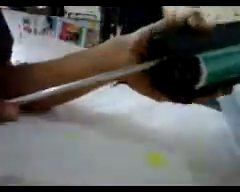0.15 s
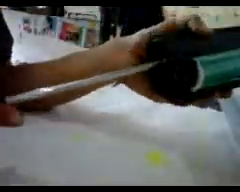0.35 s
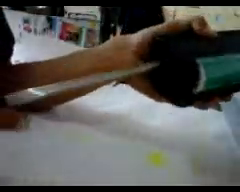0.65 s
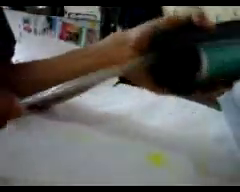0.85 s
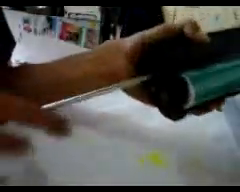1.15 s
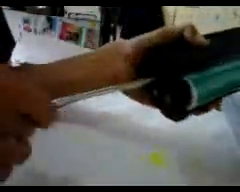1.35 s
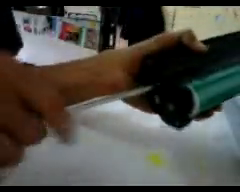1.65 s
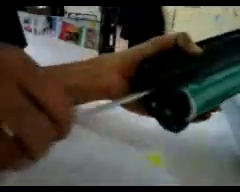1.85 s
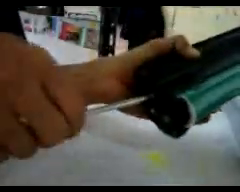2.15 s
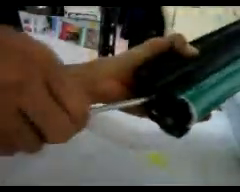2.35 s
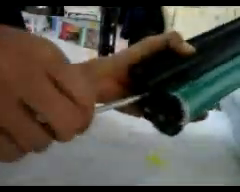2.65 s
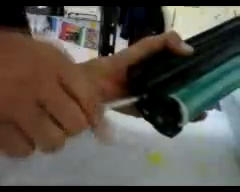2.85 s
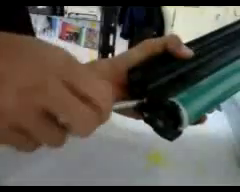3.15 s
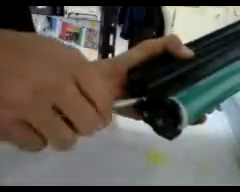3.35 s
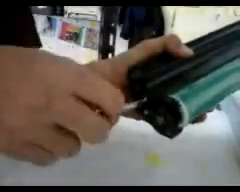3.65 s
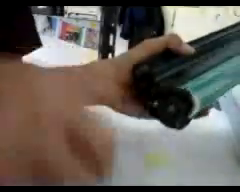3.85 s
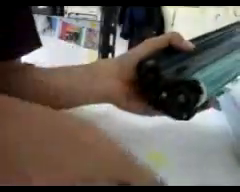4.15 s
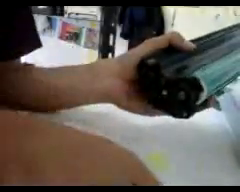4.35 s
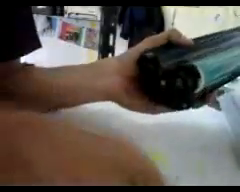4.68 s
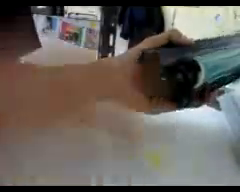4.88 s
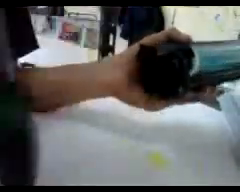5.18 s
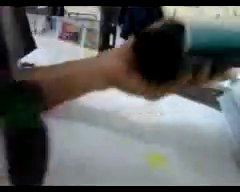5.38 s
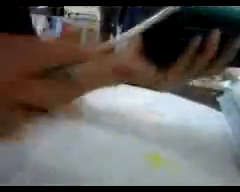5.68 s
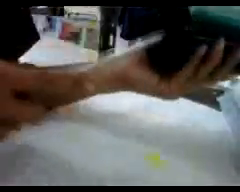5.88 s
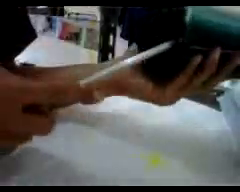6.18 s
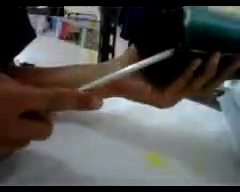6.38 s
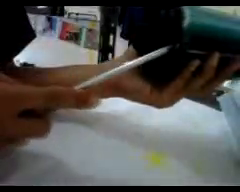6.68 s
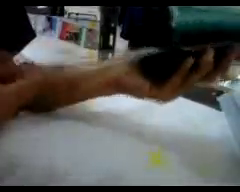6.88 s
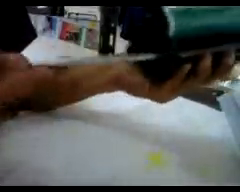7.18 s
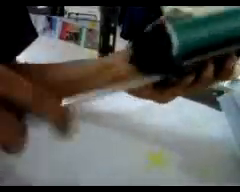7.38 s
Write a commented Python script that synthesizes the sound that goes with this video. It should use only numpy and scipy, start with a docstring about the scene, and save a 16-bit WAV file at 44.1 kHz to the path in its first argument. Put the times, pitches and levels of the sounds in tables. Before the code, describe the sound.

A small camera with muffled top end sits close to hands working a thin steel rod into a hollow plastic drum in a small cluttered room. Low street rumble and soft hiss run throughout. At 0.35 s a sharp double click snaps with a short crackle; faint clicks follow to 1.5 s. A low, uneven vehicle drone swells by 1.4 s, stays until about 3.3 s, then fades, with a click at 1.7 s and small crunches and light knocks around 2.3-3.1 s. At 4.2 s tools thump down loudly in a distorted cluster, parts chattering, with lesser knocks at 4.8-5.1 s. The loudest hollow bang lands at 5.4 s, with a rattle, and a weaker thud at 5.7 s. Then quieter background, distinct plastic clicks at 6.4 and 6.75 s, a brief crackle, and tiny crunches until 7.5 s.

```python
"""Hands work a thin steel rod into a plastic toner drum over a workbench, close to a small camera.
Short clicks and bright crunches ring hollow shell modes throughout, some together with the blows;
a vehicle's drone swells, stays and fades outside. Then tools thump down on the bench, overloading the
camera through the wood, loose parts chatter, a hollow part is set down hard and the drum is turned round.
Street noise lies under it all, with brief dips, and a small cluttered room answers the near sounds."""
import sys
import numpy as np
from scipy import signal
from scipy.fft import rfft, irfft
from scipy.io import wavfile
from scipy.ndimage import uniform_filter1d

SR = 44100
rng = np.random.default_rng(int(sys.argv[2]) if len(sys.argv) > 2 else 0)


def boost(x):
    """Linear amplitude factor 10**(x/20) for a level x in decibels (scalar or array-like)."""
    u = np.asarray(x, float) / 20
    return 10 ** u


def pcm_store(signal):
    """Save signal as 16-bit PCM."""
    levels = np.round(np.clip(np.atleast_2d(signal), -1, 1) * 32767)
    wavfile.write(sys.argv[1], SR, levels.astype(np.int16).T)


N = 332073


def unit(x):
    """Scale to rms 1."""
    return x / np.sqrt(np.mean(x ** 2))


def shaped(x, db_at):
    """Colour a sound by a function from Hz to dB."""
    hz = np.maximum(np.fft.rfftfreq(len(x), 1 / SR), 1)
    return irfft(rfft(x) * boost(db_at(hz)), len(x))


def walk(rate):
    """Random levels held 1 / rate s and slewed twice; spread 1."""
    hold = int(SR / rate)
    steps = np.repeat(rng.standard_normal(N // hold + 1), hold)
    x = uniform_filter1d(uniform_filter1d(steps, hold), hold)[:N]
    return x / x.std()


def strikes(events, modes, edges_hz, scatter_db, detune, haze_db, haze_t60, rise_ms, reach, firm, bright_db):
    """Each event, a short rough push, rings a low, a main and a high group of modes."""
    out = np.zeros(N + SR)
    t = np.arange(SR // 3) / SR
    ms_since = 1000 * t[:2048]
    hz, db, t60 = np.transpose(modes)[:, :, None]
    # modes above the last edge fall in no group and stay silent
    group = np.digitize(hz[:, 0], edges_hz) - 1
    low_band = signal.butter(3, edges_hz[:2], "band", fs=SR, output="sos")
    chance = rng.standard_normal((len(events), 2, len(modes), 1))
    rough = rng.standard_normal((len(events), 4, len(t)))
    for event, (gain, tune), noise in zip(events, chance, rough):
        s, main_db, low_db, high_db, rattle_ms, bright_hz, ring, pitch, main_hz = event
        # every push weights and loads the modes a little differently
        mode_hz = hz * np.where(group == 1, pitch, 1)[:, None] * (1 + detune * tune)
        decay = 1000. ** (-t / (ring * t60))
        rings = boost(db + scatter_db * gain) * np.sin(2 * np.pi * mode_hz * t) * decay
        # the push chatters: a few hard grains among many soft ones
        grains = noise[3, :2048] * np.abs(noise[3, 2048:4096]) ** 1.41
        push = grains * np.exp(-ms_since / max(rattle_ms, .2)) * np.minimum(ms_since / rise_ms, 1)
        # one firm impulse comes at the top of the rise
        impulse = np.arange(len(push)) == int(rise_ms * SR / 1000)
        push = push / np.linalg.norm(push) + firm * impulse
        # an event with more top also reaches higher
        top_hz = np.clip(edges_hz[3] * boost(reach * high_db), 1.39 * bright_hz, 7000)
        main_band = signal.butter(3, main_hz, "band", fs=SR, output="sos")
        high_band = signal.butter(3, [edges_hz[2], top_hz], "band", fs=SR, output="sos")
        i = int(s * SR)
        for g, (band, part_db) in enumerate([(low_band, low_db), (main_band, 0), (high_band, high_db)]):
            # countless small modes blur into a decaying haze between the clear ones
            haze = boost(haze_db[g]) * noise[g] * 1000. ** (-t / (ring * haze_t60[g]))
            struck = signal.fftconvolve(rings[group == g].sum(0) + haze, push)[:len(t)]
            part = signal.sosfilt(band, struck)
            if g == 2:  # one stretch of the top range stands out
                part = part + boost(bright_db) * signal.lfilter(*signal.iirpeak(bright_hz, 5, SR), part)
            out[i:i + len(t)] += boost(main_db + part_db) * part / np.abs(part).max()
    return out[:N]


def clicks_and_crunches():
    """Rough pushes ring body, main and treble modes of hollow plastic, shortened by the gripping hand."""
    # short clicks and bright crunches, some together with the blows: start_s, main_peak_db,
    # treble_db and body_db (both beside the main peak), rattle_ms, bright_hz (favoured treble)
    short_sounds = [(0.3483, -17, 0.5, -8.5, 1.4, 3860), (0.3555, -19.5, -2.5, -10, 1.7, 3740),
                    (0.663, -33.5, -8.5, -10, 2.9, 3700), (0.8071, -60.5, 17.5, -14, 0.88, 4300),
                    (0.857, -46, -18, 0, 11, 4260), (0.898, -45.5, 7, -3, 3.3, 5200),
                    (0.9738, -41.5, -3, -24, 0.82, 3040), (1.2379, -45.5, -2.5, 6.5, 2.6, 4350),
                    (1.4456, -46.5, -20, -1.5, 8.7, 2640), (1.696, -30, -7.5, -15, 1.2, 4400),
                    (1.869, -51, 13.5, -14, 1.8, 4400), (2.266, -43, 0, -1, 5.8, 5130),
                    (2.4444, -41.5, 5.5, -5, 3.4, 5310), (2.5796, -40, 13.5, 5.5, 11, 4510),
                    (3.035, -40, -31, 5, 2.2, 2700), (3.046, -56, -21, 23.5, 2.8, 2700),
                    (4.201, -49, 13.5, -7, 3, 4700), (4.2055, -27.5, -1, -12, 2.6, 3400),
                    (4.2365, -43, 3.5, -15, 1.4, 3560), (4.467, -49.5, 9, 9.5, 5, 3680),
                    (4.609, -51.5, 6, 5, 2.7, 4100), (4.6723, -53.5, 6.5, 5, 1.6, 4800),
                    (4.6949, -44, 0.5, -16, 2.2, 4660), (4.8205, -48, 1, 9, 7.5, 4500),
                    (4.884, -41, 0, -10, 3.7, 3500), (5.416, -32.5, -1, 1, 4, 4220),
                    (5.451, -50, 3.5, -10, 3.3, 4000), (5.9553, -65, 14.5, -5, 4.3, 4250),
                    (6.098, -59, 12, -1, 1.4, 4280), (6.4368, -31.5, -3, -16, 3.5, 2900),
                    (6.755, -27.5, 1, -23, 6.2, 3670), (6.765, -31.5, -7, -10, 3.1, 2900),
                    (6.974, -40.5, -6, -17, 2.4, 4230), (7.0772, -44, 8.5, -3, 0.97, 3750),
                    (7.3766, -48.5, -17, -28, 2.6, 2650), (7.391, -50.5, 4, -28, 6.1, 2640),
                    (7.4128, -56, 15.5, -1, 2.5, 4280), (7.438, -47.5, 12.5, -7, 7.5, 3000)]
    # modes of the hollow shell: mode_hz, level_db, free_t60_s (before the grip)
    shell_modes = [(598, 7, 0.073), (687, 5, 0.04), (1508, -9, 0.07), (1678, -0.5, 0.04), (1867, -3, 0.057),
                   (2028, 0.5, 0.044), (2350, -7.5, 0.076), (2675, -3.5, 0.06), (2876, -5.5, 0.095),
                   (3196, -8.5, 0.034), (3486, -9, 0.069), (3670, -2.5, 0.06), (3794, -13.5, 0.047),
                   (4164, -10.5, 0.042), (4620, -6, 0.03), (5340, -3, 0.022)]
    grip = 0.68  # share of the free ring time left by the holding hand
    turned_s = 5.5  # the drum is turned round in the hand: its main modes and their range shift
    edges_hz = (500, 1440, 2550, 4400)
    events = []
    for s, main_db, treble_db, body_db, rattle_ms, bright_hz in short_sounds:
        pitch, main_hz = (0.97, (1570, 2120)) if s > turned_s else (1, edges_hz[1:3])
        events.append((s, main_db, body_db, treble_db, rattle_ms, bright_hz, grip, pitch, main_hz))
    return strikes(events, shell_modes, edges_hz, scatter_db=2.5, detune=0.0051,
                   haze_db=(-19, 0, 7), haze_t60=(.05, .055, .045), rise_ms=1.9, reach=0.73,
                   firm=0.65, bright_db=5.5)


def bench_blows():
    """Tools put down hard ring the bench top in thump, main and clack modes."""
    # blows on the bench: start_s, main_peak_db, thump_db and clack_db (both beside the main peak),
    # ring_factor (times the free ring time)
    tool_blows = [(2.58, -33, -17, -2.5, 0.81), (3.037, -38.5, -12, 14.5, 0.29),
                  (4.205, -20, -1, 1.5, 0.76), (4.216, -14.5, -2.5, -2, 0.44), (4.229, -20, 0, -1.5, 0.26),
                  (4.263, -45.5, 19.5, -18, 1.1), (4.285, -37, 9.5, -16, 0.39), (4.364, -39, -32, 3, 0.35),
                  (4.479, -46.5, -7, 13, 0.077), (4.492, -41, -19, 12, 0.058),
                  (4.545, -50.5, -17, 3.5, 0.51), (4.822, -50, -15, 15.5, 0.16),
                  (4.832, -35, 13, -0.5, 0.84), (4.882, -28, -8, 4, 0.19), (4.895, -26.5, 11.5, -15, 0.7),
                  (4.993, -52, -10, 11, 0.64), (5.017, -43.5, -14, 3, 0.47), (5.077, -25, -2.5, -1.5, 0.54),
                  (5.415, -10, -12.5, 4, 0.64), (5.427, -18, -7.5, 0.5, 1.53), (5.481, -32, -8, -6, 1.5),
                  (5.69, -36.5, 7, -11, 0.89)]
    # modes of the bench top: mode_hz, level_db, free_t60_s (before the ring factor)
    bench_modes = [(63.6, -14, 0.13), (82, 22.5, 0.17), (117.8, 8.5, 0.24), (171.3, 23, 0.13),
                   (253, -16, 0.22), (313.2, -8, 0.26), (335.6, -20, 0.31), (374, -15, 0.22),
                   (433, -7, 0.033), (547, -7.5, 0.13), (607, -8, 0.15), (667.5, -4.5, 0.09),
                   (795, -4.5, 0.076), (1300, -15.5, 0.024), (1537, -8, 0.035)]
    contact_ms, clack_hz = 4.34, 663
    edges_hz = (45, 190, 430, 1500)
    events = [(s, main_db, thump_db, clack_db, contact_ms, clack_hz, ring, 1, edges_hz[1:3])
              for s, main_db, thump_db, clack_db, ring in tool_blows]
    return strikes(events, bench_modes, edges_hz, scatter_db=3, detune=0.0073,
                   haze_db=(8, 9.5, 8), haze_t60=(.13, .14, .11), rise_ms=2.162, reach=0.07,
                   firm=0.94, bright_db=-3.0)


def hollow_knocks():
    """A hollow part set down hard: a strong air mode and weaker neighbours, wavering as it rocks."""
    # hollow part set down hard: start_s, level_db (offset to the mode levels)
    set_downs = [(5.419, -6.5), (5.689, -33)]
    # modes of the hollow part: mode_hz, level_db, t60_s
    hollow_modes = [(123.4, -11.5, 0.24), (320.3, 1.5, 0.23), (363.5, -15.5, 0.15)]
    rise_ms = 9.9
    start_s, level_db = np.transpose(set_downs)
    since = np.maximum(np.arange(N) / SR - start_s[:, None], 0)
    ring = 0
    for hz, db, t60 in hollow_modes:
        wave = np.sin(2 * np.pi * hz * since + 0.25 * walk(45))
        ring = ring + boost(db) * 1000. ** (-since / t60) * wave
    knocks = ring * np.minimum(1000 * since / rise_ms, 1)
    return boost(level_db) @ knocks * boost(1.4 * walk(50))


def overloaded(shock):
    """The shock reaches the camera through the wood and flattens there, its top softened."""
    ceiling = boost(-17.5)
    flat = ceiling * np.tanh(shock / ceiling)
    return signal.lfilter(*signal.butter(1, 4500, fs=SR), flat)


def clatter():
    """Loose parts chatter and scrape: dense tiny ticks of unequal size, in ragged bunches."""
    # bunches of ticks: start_s, end_s, level_db (before the fade), centre_hz, fade_db (reached at the end)
    tick_bunches = [(0.339, 0.511, -41, 4720, -24.5), (0.352, 0.448, -40.5, 2480, -16),
                    (3.099, 3.174, -48.5, 5070, -1.5), (3.635, 3.709, -55.5, 5120, 0.5),
                    (4.204, 4.247, -36, 2930, -11), (4.221, 4.247, -46, 5200, -3),
                    (4.206, 4.244, -30, 1570, -11.5), (4.268, 4.291, -52.5, 1700, -3),
                    (4.27, 4.3, -54.5, 3670, -3.5), (4.801, 4.819, -45.5, 1300, -0.5),
                    (4.811, 4.845, -50, 4740, 2), (4.837, 4.877, -55.5, 4600, -1),
                    (4.875, 4.907, -44.5, 4320, -2.5), (4.9, 4.955, -53.5, 4500, 1),
                    (4.88, 4.938, -36.5, 1450, -22), (4.969, 5.193, -60, 5260, 1.5),
                    (5.415, 5.469, -38, 3500, -6), (5.416, 5.485, -50.5, 2174, -19),
                    (5.487, 5.526, -57, 3730, -8.5), (6.746, 6.854, -47, 4640, -15.5)]
    size_db = 3.0 * np.minimum(rng.exponential(size=N), 4.2) + 3.7 * walk(220)
    ticks = rng.standard_normal(N) * boost(size_db)
    power = np.mean(ticks ** 2)
    out = np.zeros(N)
    for start, end, db, hz, fade_db in tick_bunches:
        span = slice(int(start * SR), int(end * SR))
        t = np.arange(N)[span] / SR
        gate = np.clip(np.minimum((t - start) / 0.0019, (end - t) / 0.013), 0, 1)
        fade = boost(fade_db * (t - start) / (end - start))
        band = signal.butter(2, [hz / 1.49, hz * 1.144], "band", fs=SR, output="sos")
        bunch = signal.sosfilt(band, ticks[span]) / np.sqrt(power * hz / SR)
        out[span] += boost(db) * gate * fade * bunch
    return out


def room(x):
    """A small cluttered room: a dense tail, thin in the bass."""
    t60_s, tail_db = 0.23, -18
    t = np.arange(SR // 2) / SR
    tail = rng.standard_normal(len(t)) * 1000. ** (-t / t60_s) * np.minimum(t / 0.0035, 1)
    tail = signal.lfilter(*signal.butter(1, [400, 5000], "band", fs=SR), tail)
    return boost(tail_db) * signal.fftconvolve(x, tail / np.linalg.norm(tail))[:N]


def engine():
    """Uneven firings give lines at multiples of the cycle rate, each wavering through the walls."""
    # lines of the engine: cycle_multiple, level_db (beside the drone level)
    engine_lines = [(1, -5.5), (2, -12.5), (4, 4.5), (6, -7), (7, -13.5), (8, -22), (10, -9.5), (11, -11),
                    (12, -38), (13, -21.5)]
    cycle_hz, drone_db = 38.9, -55.5  # mean rate; level while in front of the building
    arrives_s, leaves_s = 1.44, 3.27
    rise_db_s, fall_db_s = 24.5, 13.5  # swell before, fade after
    swell_from_s, swell_to_s, swell_db = 2.0, 3.25, 11.7  # the lowest line swells
    t = np.arange(N) / SR
    turn = 2 * np.pi * np.cumsum(cycle_hz * (1 + 0.00614 * walk(2))) / SR
    swell = swell_db * np.clip(np.minimum(t - swell_from_s, swell_to_s - t) / .1, 0, 1)
    lines = 0
    for k, line_db in engine_lines:
        line_level = boost(line_db + swell * (k == 1) + 1.2 * walk(5.8))
        lines = lines + line_level * np.sin(k * turn + 0.44 * walk(7.3))
    before, after = np.maximum(arrives_s - t, 0), np.maximum(t - leaves_s, 0)
    return np.sqrt(2) * lines * boost(drone_db - rise_db_s * before - fall_db_s * after)


def street():
    """Rumble, roar and hiss swell as traffic goes by; six slices of each flicker a little alone."""
    # street noise in the room: time_s, roar_db, hiss_db (levels)
    street_levels = [(0.0, -54.5, -66.5), (0.48, -58.5, -65.5), (1.49, -50.5, -56), (2.58, -51.5, -56),
                     (3.21, -53, -56.5), (4.11, -57, -64.5), (4.76, -58.5, -66.5), (5.01, -58, -63),
                     (5.14, -60.5, -67), (5.41, -60, -71), (5.58, -67, -77.5), (5.77, -61.5, -68.5),
                     (5.91, -62.5, -70), (6.5, -58.5, -67.5), (7.53, -58.5, -64)]
    # colour of the street noise, relative within each range: colour_hz, density_db (per Hz)
    street_colour = [(12, -38.5), (20, 0.5), (43, 1.5), (123, 2), (154, 0.5), (187, -9), (313, -13),
                     (476, -16), (579, -14.5), (923, -27), (1400, -22), (3230, -27), (4230, -19.5),
                     (6430, -29.5), (7090, -38), (9220, -75.5), (15600, -120)]
    s, roar_db, hiss_db = np.transpose(street_levels)
    rumble_db = -49.5 + 0.61 * (roar_db + 55.0)  # the rumble follows the roar in part
    hz, db = np.transpose(street_colour)
    # level_db, flicker_db, low_hz, high_hz
    ranges = [(rumble_db, 2.6, 18, 275), (roar_db, 1.6, 275, 3250), (hiss_db, 1.6, 3250, 7400)]
    out = 0
    for level_db, flicker_db, lo, hi in ranges:
        edges = np.geomspace(lo, hi, 7)
        band = 0
        for a, b in zip(edges, edges[1:]):
            def slice_db(f):
                return np.where((f >= a) & (f < b), np.interp(np.log(f), np.log(hz), db), -200)
            band = band + boost(flicker_db * walk(13)) * shaped(rng.standard_normal(N), slice_db)
        out = out + unit(band) * boost(np.interp(np.arange(N) / SR, s, level_db))
    return out


def dipped(x):
    """The range above a given frequency falls away for a moment, then returns."""
    # brief dips of the background: start_s, end_s, above_hz, depth_db
    background_dips = [(0.301, 0.334, 680, -28), (0.608, 0.644, 3600, -14), (4.325, 4.337, 890, -15),
                       (4.782, 4.797, 2830, -39), (5.359, 5.41, 573, -22.5), (6.708, 6.745, 3270, -20)]
    t = np.arange(N) / SR
    for start, end, hz, db in background_dips:
        gate = np.clip(np.minimum(t - start, end - t) / 0.0015, 0, 1)
        upper = shaped(x, lambda f: np.where(f > hz, 0, -200))
        x = x - gate * (1 - boost(db)) * upper
    return x


def scene():
    """Close handling with its room tail over the street."""
    near = clicks_and_crunches() + overloaded(bench_blows() + hollow_knocks()) + clatter()
    background = dipped(street() + engine())
    return (near + room(near) + background)[None]


def top_cut(x):
    """Nothing passes above the cut-off."""
    return signal.sosfilt(signal.butter(12, 7240, fs=SR, output="sos"), x)


def record(dry):
    """The camera cuts the top steeply above 7250 Hz."""
    cut = signal.sosfilt(signal.ellip(10, .3, 60, 7250, fs=SR, output="sos"), dry)
    return top_cut(cut)


dry = scene()
out = record(dry)
pcm_store(out)
```